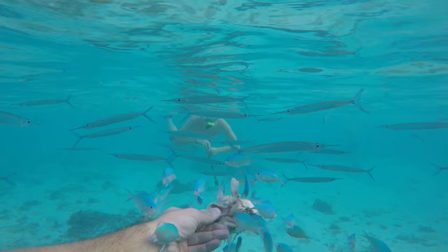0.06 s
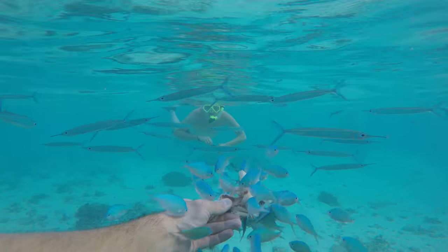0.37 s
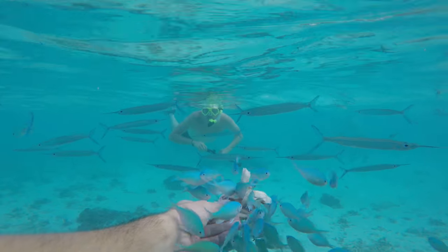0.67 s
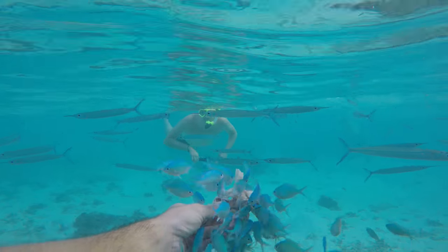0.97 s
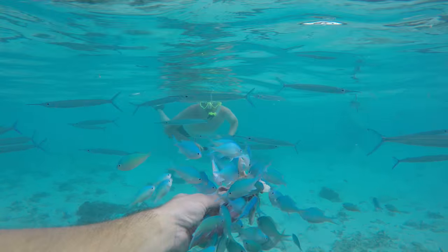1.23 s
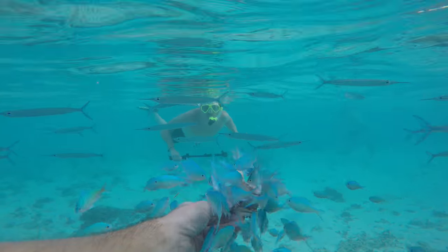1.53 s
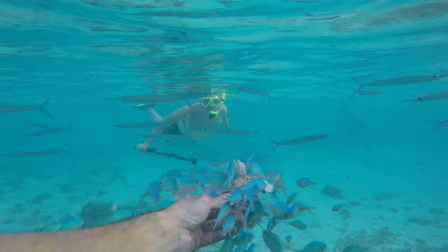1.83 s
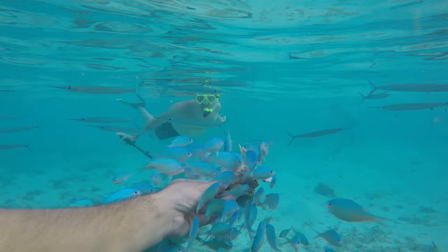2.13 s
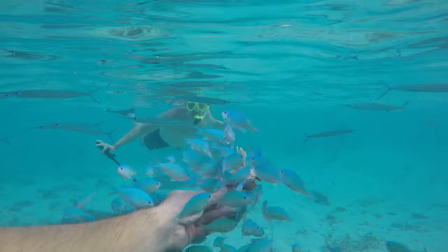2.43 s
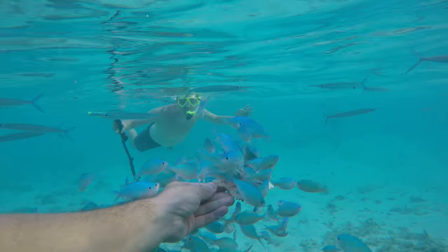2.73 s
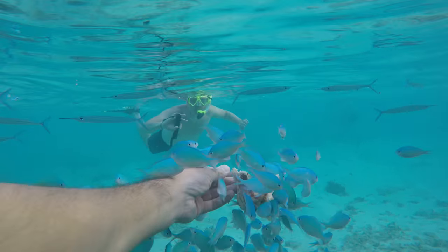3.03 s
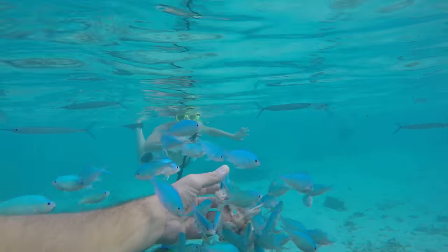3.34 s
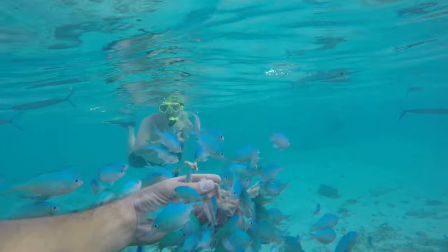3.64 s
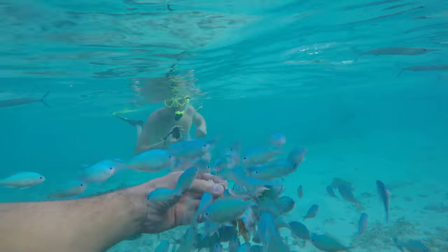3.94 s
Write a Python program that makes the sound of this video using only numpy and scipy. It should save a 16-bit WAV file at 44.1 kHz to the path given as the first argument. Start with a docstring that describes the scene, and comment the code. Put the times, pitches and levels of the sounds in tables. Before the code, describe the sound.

Water churns around a submerged microphone with a hollow drone, dull knocks and bubbles.

```python
"""Shallow sea inside a camera housing

Moving water rings the submerged housing in a hollow drone and pushes on it with a low rumble;
dull knocks bump it. Bubbles ring as gliding sines: a gurgle at the start, single pings later.
Sharp snaps, probably shrimp, crack over faint fizz and hiss. Water swishes past once."""
import sys
import numpy as np
from scipy import signal
from scipy.fft import rfft, irfft
from scipy.io import wavfile

SR = 44100
rng = np.random.default_rng(int(sys.argv[2]) if len(sys.argv) > 2 else 0)


def transcribe(u):
    """Save the signal u as a 16-bit wav file named by the first command-line argument.

    u: samples, shape (n,) or (channels, n), limited to [-1, 1]; the rate is SR.
    q: integer samples, one column per channel.
    """
    v = np.clip(np.atleast_2d(u).T, -1, 1)
    q = np.round(v * 32767).astype(np.int16)
    wavfile.write(sys.argv[1], SR, q)


N = 176400
TIME_S = np.arange(N) / SR

# hollow drone: time_s, level_db
DRONE_LEVEL = [(0,-42),(.2,-37.5),(.32,-37.5),(.5,-34),(1.3,-34),(1.62,-33.5),(2.14,-35.5),(2.18,-58),(2.22,-63),(2.27,-56),(2.32,-40.5),(2.7,-41),(3.09,-41),(3.13,-50.5),(3.19,-60),(3.27,-46),(3.32,-40),(3.62,-37),(3.8,-33.5),(3.97,-28)]
# housing resonances: pitch_hz, width_hz, gain_db
HOUSING_MODES = [(385.8,53.4,-1.5),(435.3,45.3,0),(533,53.4,1),(604,40,-4),(642,85,-19.5),(774,39,-21),(847.3,25.2,-14.5)]
# water rumble: time_s, level_db
RUMBLE_LEVEL = [(0,-41),(.1,-36.5),(.2,-30),(.29,-39.5),(.37,-52),(.45,-38.5),(.53,-47),(.83,-44.5),(.95,-40.5),(1.13,-42),(1.25,-47),(1.32,-45.5),(1.62,-46),(2.03,-48.5),(2.08,-39.5),(2.17,-47),(2.55,-43.5),(3.15,-48),(3.32,-43),(3.7,-47),(4,-48)]
# rumble spectrum: freq_hz, gain_db
RUMBLE_SPECTRUM = [(18,-10),(27,6),(43,-9.5),(65,-6),(100,-10.5),(160,-13.5),(280,-20.5),(550,-39.5),(850,-44.5)]
# hiss spectrum: freq_hz, gain_db
HISS_SPECTRUM = [(600,-5),(1000,5.5),(1400,1.5),(2000,-2),(2900,3.5),(3400,-3.5),(4100,2.5),(5200,-4),(6300,-3.5),(7500,-8),(9500,-6),(11800,-10),(14300,-9),(16000,-16)]
# shoves of water: centre_s, half_width_s, peak_db, sway_hz
WATER_SURGES = [(0.035,0.071,-33.5,32.5),(0.153,0.051,-28,42.6),(0.208,0.058,-30,64.4),(0.458,0.036,-28,41.9),(.96,0.062,-36.5,48),(1.236,0.028,-32,37),(2.08,0.031,-32,45.55)]
# fizz of tiny bubbles: time_s, level_db
FIZZ_LEVEL = [(0,-62),(.11,-57.5),(.2,-48),(.27,-67),(.39,-60.5),(.46,-70),(.88,-69),(.96,-56.5),(1.06,-69.5),(1.5,-65),(2.3,-68),(2.68,-61),(2.85,-70.5),(3.35,-64),(3.5,-61),(3.7,-70.5),(4,-71)]
# fizz band weights: pitch_hz, gain_db
FIZZ_SPECTRUM = [(1300,-3.5),(1600,3.5),(2100,1.5),(2800,3.5),(3400,0),(4100,3),(5500,-16),(7500,-15),(10000,-6)]
# high sizzle: time_s, level_db
SIZZLE_LEVEL = [(0,-84),(1.26,-80),(1.29,-72.5),(1.45,-72),(1.5,-75),(4,-77)]
# sizzle bands: centre_hz, width_hz, gain_db
SIZZLE_PEAKS = [(6240,900,1.5),(13100,1100,-2.5)]
# single bubbles: start_s, level_db, pitch_hz, t60_s, glide_octaves_per_s
BUBBLE_PINGS = [(0.1303,-26.5,2510,0.023,-5),(.162,-33.5,1230,0.043,-4),(0.1616,-32,2450,.02,4),(0.181,-34,1690,0.013,4),(0.182,-40,2780,0.022,-6),(.131,-43,4350,0.01,-4),(.186,-52,5240,0.01,-4),(0.192,-45,4170,0.011,8),(.197,-39,3040,0.028,1),(.2,-50,9700,.008,0),(.203,-33.5,2060,0.036,-4),(0.21,-41.5,1566,0.075,-6),(0.21,-39.5,5470,0.012,-2),(.2165,-14,556.7,.12,1),(.22,-46,5300,.015,2),(.232,-47,6100,.008,1.5),(0.2332,-35,2920,.025,-14),(0.243,-21.5,770,0.091,2),(.245,-46,3100,0.036,2),(0.2435,-45,2150,0.046,0),
                (0.5306,-43.5,1490,0.031,-12),(.5726,-49,2500,0.048,11.5),(1.495,-46,1600,0.029,-4),(1.7716,-43.5,2700,0.01,-6),(1.8387,-48,1620,0.023,2),(2.048,-48,1650,0.031,-2),(2.0824,-43.5,1710,0.024,-7),(2.6689,-37.5,2880,0.014,-2),
                (2.7025,-19.5,436,0.17,4.0),(2.7025,-31,862,0.12,-9.5),(2.7681,-43.5,2140,0.032,1),(3.1018,-40,2850,0.016,3),(3.4295,-40.5,3810,0.013,-5),(3.513,-50.5,1573,0.071,2),(3.555,-27.5,841,0.1,-0.5),(3.584,-47,4380,.018,2),(3.602,-40,3670,0.018,-7),(3.61,-43.5,2850,0.03,-7)]
# knocks on the housing: start_s, peak_db
HOUSING_KNOCKS = [(.183,-22),(.494,-25.5),(.6,-35),(.668,-23),(.676,-24),(0.808,-24),(1.285,-17.5),(1.319,-22.5),(1.556,-20.5),(1.605,-21.5),(2.049,-32),(2.125,-31),(2.153,-22),(2.484,-25.5),(2.702,-26),(3.112,-27),(3.235,-23),(3.243,-26),(3.352,-32),(3.452,-25.5),(3.571,-23),(3.641,-18),(3.834,-20.5),(3.908,-30),(3.942,-22.5)]
# big bubbles breaking loose: start_s, peak_db
BUBBLE_THUDS = [(.213,-22.5),(2.702,-27.5)]
# near snaps: start_s, crack_db, ring_db
NEAR_SNAPS = [(0.333,-52,-53.5),(0.772,-46,-38),(0.779,-33.5,-30),(.781,-33,-42),(.824,-51,-62),(0.8412,-49,-72),(0.919,-51,-68),(1.8555,-46,-69),(2.3817,-34,-30),(3.0134,-32.5,-52),(3.356,-44.5,-52),(3.586,-51,-53),(3.603,-49,-46.5)]
# crack spectrum: freq_hz, gain_db
CRACK_SPECTRUM = [(2000,-21),(4200,-26.5),(5500,13),(6500,4.5),(8000,12),(10000,9.5),(12000,12),(14000,-2),(16000,17)]
# housing ring after a snap: freq_hz, gain_db
RING_SPECTRUM = [(700,-42),(1400,-21),(2300,9),(3400,6.5),(4500,-1.5),(7000,-10),(14000,-43)]
# housing modes rung by snaps: pitch_hz, gain_db, t60_s
BRIGHT_MODES = [(1400,-14,0.043),(1660,-8,0.044),(2210,-2,.04),(2470,-14,0.065),(2885,-1.5,0.033),(3340,-16.5,0.07),(3870,0.5,0.038),(5250,1,.025),(10610,-1.5,.012)]
# swish spectrum: freq_hz, gain_db
SWISH_SPECTRUM = [(900,-3),(1700,-5),(2200,-5),(2600,15),(3000,1),(3600,-16),(6000,-24),(12000,-49)]


def from_db(db):
    return 10 ** (np.asarray(db) / 20)


def unit_rms(x):
    return x / np.sqrt(np.mean(x ** 2) + 1e-20)


def envelope(rows):
    """Gain over time from time_s, level_db rows."""
    return from_db(np.interp(TIME_S, *np.transpose(rows)))


def decay(t, t60_s):
    return np.exp(-np.log(1000) * t / t60_s)


def noise(spectrum):
    """Unit-rms noise shaped by freq_hz, gain_db rows; steep skirts beyond them."""
    hz, db = np.transpose(spectrum)
    bins_hz = np.maximum(np.arange(N // 2 + 1) * SR / N, 1)
    skirts = np.minimum(1, np.minimum(bins_hz / hz[0], hz[-1] / bins_hz)) ** 4
    gain = from_db(np.interp(np.log(bins_hz), np.log(hz), db))
    return unit_rms(irfft(rfft(rng.standard_normal(N)) * skirts * gain, N))


def drift(rate_hz):
    """Smooth random wander, unit rms."""
    bins_hz = np.arange(N // 2 + 1) * SR / N
    return unit_rms(irfft(rfft(rng.standard_normal(N)) / (1 + (bins_hz / rate_hz) ** 2), N))


def clicks(per_s, spread_db):
    """Random impulses, mostly small, a few large."""
    size = from_db(spread_db * np.minimum(rng.exponential(1, N), 4))
    return (rng.random(N) < per_s / SR) * size * rng.choice([-1, 1], N) + 1e-18


def resonate(x, hz, width_hz):
    """Two-pole resonance, unit peak gain."""
    r = np.exp(-np.pi * width_hz / SR)
    feedback = [1, -2 * r * np.cos(2 * np.pi * hz / SR), r * r]
    return signal.lfilter(np.array([1, 0, -1]) * (1 - r * r) / 2, feedback, x)


def steep_resonance(x, hz, width_hz):
    """Two resonances in series, width_hz overall."""
    stage_hz = width_hz / np.sqrt(np.sqrt(2) - 1)
    return resonate(resonate(x, hz, stage_hz), hz, stage_hz)


def noise_band(hz, width_hz):
    return unit_rms(steep_resonance(rng.standard_normal(N), hz, width_hz))


def add(out, start_s, sound):
    i = int(np.clip(start_s * SR, 0, N - 1))
    out[i:i + len(sound)] += sound[:N - i]


def drone(flow_db=0.5, flutter_db=0.5, wall_cut_hz=897, overtone_db=-37.5):
    """Smooth flow and small jolts of water ring the housing; its wall cuts the treble."""
    jolts = unit_rms(clicks(per_s=200, spread_db=2.5))
    modes = 0
    for hz, width_hz, db in HOUSING_MODES:
        push = jolts * rng.choice([-1, 1], N) + from_db(flow_db) * rng.standard_normal(N)
        modes += from_db(db) * steep_resonance(push, hz, width_hz)
    muffled = signal.sosfilt(signal.cheby1(8, .5, wall_cut_hz, fs=SR, output="sos"), modes)
    overtone = from_db(overtone_db) * noise_band(hz=1196, width_hz=25)
    flutter = from_db(flutter_db * drift(rate_hz=24))
    return envelope(DRONE_LEVEL) * (unit_rms(muffled * flutter) + overtone)


def deep_hum(max_db=-51.5, knee_db=-44):
    """The deepest housing resonance hums evenly, fading only in the drone's lulls."""
    drive = np.tanh(envelope(DRONE_LEVEL) / from_db(knee_db))
    return from_db(max_db) * drive * noise_band(hz=197, width_hz=43.7)


def rumble():
    """Low pressure swings of moving water."""
    return envelope(RUMBLE_LEVEL) * noise(RUMBLE_SPECTRUM)


def hiss(level_db=-67.5, flutter_db=0.2):
    """Faint, near-steady hiss."""
    return from_db(level_db - flutter_db * drift(rate_hz=25)) * noise(HISS_SPECTRUM)


def surges():
    """Each shove of water sways the housing for a few slow cycles."""
    out = 0
    for centre_s, half_width_s, db, hz in WATER_SURGES:
        swell = np.exp(-((TIME_S - centre_s) / half_width_s) ** 2)
        out += from_db(db) * swell * np.sin(2 * np.pi * (hz * TIME_S + rng.random()))
    return out


def fizz(bands=16, pips_per_s=140, attack_s=.001, t60_s=0.04, width_ratio=0.29):
    """Tiny bubbles pip at random in noise bands, more densely in stirred water."""
    gain = envelope(FIZZ_LEVEL)
    crowding = (gain / np.median(gain)) ** .4
    energy = clicks(pips_per_s * crowding, spread_db=2.4) ** 2 / crowding
    t = TIME_S[:SR // 10]
    pip = decay(t, t60_s) * (1 - np.exp(-t / attack_s))
    hz, db = np.transpose(FIZZ_SPECTRUM)
    band_index = rng.integers(0, bands, N)
    out = 0
    for k, pitch_hz in enumerate(np.geomspace(hz[0], hz[-1], bands)):
        pips = np.sqrt(np.abs(signal.oaconvolve(energy * (band_index == k), pip ** 2)[:N]))
        out += from_db(np.interp(pitch_hz, hz, db)) * pips * noise_band(pitch_hz, width_ratio * pitch_hz)
    return gain * unit_rms(out)


def sizzle(flutter_db=4):
    """Two high, narrow bands of hiss flutter unevenly."""
    bands = sum(from_db(db) * noise_band(hz, width_hz) for hz, width_hz, db in SIZZLE_PEAKS)
    return envelope(SIZZLE_LEVEL) * from_db(flutter_db * drift(rate_hz=11)) * unit_rms(bands)


def bubbles(splash_db=-21.5):
    """Each bubble rings as a dying, gliding sine with a little splash around its pitch."""
    out, t = np.zeros(N), TIME_S[:SR // 4]
    for start_s, db, hz, t60_s, octaves_per_s in BUBBLE_PINGS:
        phase = 2 * np.pi * np.cumsum(hz * 2 ** (octaves_per_s * t)) / SR
        tone = np.sin(phase) * decay(t, t60_s)
        band = resonate(resonate(rng.standard_normal(len(t)), hz, hz / 2), hz, hz / 2)
        splash = from_db(splash_db) * unit_rms(band) * decay(t, t60_s / 2)
        attack = 1 - np.exp(-(t * hz) ** 2)  # about one cycle
        add(out, start_s, from_db(db) * attack * (tone + splash))
    return out


def bumps(rows, low_hz, high_hz, dull_hz=527):
    """Each soft bump swings the housing for a few cycles within a band."""
    band = signal.butter(2, [low_hz, high_hz], "band", fs=SR, output="sos")
    lowpass = signal.butter(2, dull_hz, fs=SR, output="sos")
    bump = signal.sosfilt(np.vstack([band, lowpass]), signal.unit_impulse(SR // 10))
    out = np.zeros(N)
    for start_s, db in rows:
        add(out, start_s, from_db(db) * bump / np.abs(bump).max())
    return out


def knocks():
    """Dull, hollow knocks on the housing."""
    return bumps(HOUSING_KNOCKS, low_hz=363, high_hz=527)


def thuds():
    """Big bubbles break loose with low thuds."""
    return bumps(BUBBLE_THUDS, low_hz=44, high_hz=206)


def snaps(crack_t60_s=.012, ring_t60_s=0.015, modes_db=-7, vary_db=0.5, far_db=-68):
    """Near snaps crack and ring the housing's bright modes; far ones only tick."""
    crack_gain, ring_gain, tones = np.zeros((3, N))
    t = TIME_S[:SR // 10]
    for start_s, crack_db, ring_db in NEAR_SNAPS:
        add(crack_gain, start_s, from_db(crack_db) * decay(t, crack_t60_s))
        add(ring_gain, start_s, from_db(ring_db) * decay(t, ring_t60_s))
        for hz, db, t60_s in BRIGHT_MODES:
            gain = rng.choice([-1, 1]) * from_db(ring_db + db + modes_db + vary_db * rng.standard_normal())
            add(tones, start_s, gain * decay(t, t60_s) * np.sin(2 * np.pi * hz * t))
    far_ticks = np.abs(clicks(per_s=22, spread_db=4))
    crack_gain += from_db(far_db) * signal.fftconvolve(far_ticks, decay(t, crack_t60_s))[:N]
    return crack_gain * noise(CRACK_SPECTRUM) + ring_gain * noise(RING_SPECTRUM) + tones


def swish(peak_s=2.505, level_db=-45, rise_t60_s=0.17, fall_t60_s=0.16, grain_db=4.0):
    """A short, grainy swish of water swells and dies."""
    rise = decay(np.maximum(peak_s - TIME_S, 0), rise_t60_s)
    fall = decay(np.maximum(TIME_S - peak_s, 0), fall_t60_s)
    return rise * fall * from_db(level_db + grain_db * drift(rate_hz=120)) * noise(SWISH_SPECTRUM)


def scene():
    """One microphone inside the housing."""
    housing = drone() + deep_hum() + knocks() + thuds() + surges()
    sea = rumble() + hiss() + sizzle() + bubbles() + fizz() + snaps() + swish()
    return (housing + sea)[None]


def record(dry, cutoff_hz=15350):
    """Steep low-pass."""
    return signal.sosfilt(signal.ellip(10, .1, 80, cutoff_hz, fs=SR, output="sos"), dry)


dry = scene()
out = record(dry)
transcribe(out)
```